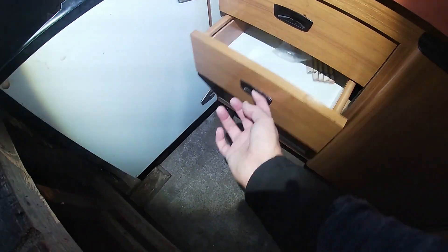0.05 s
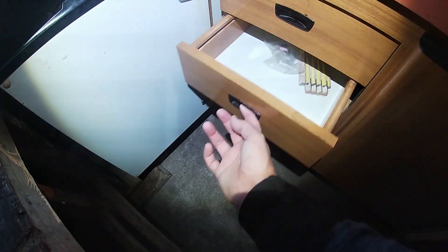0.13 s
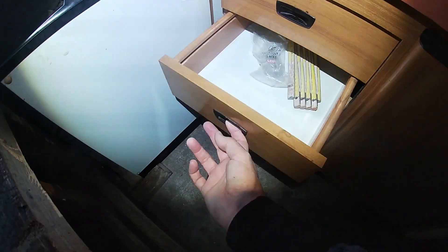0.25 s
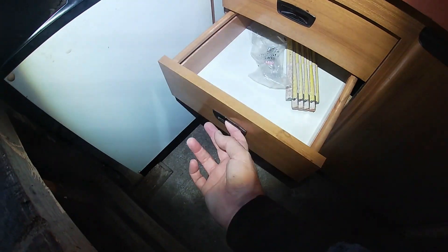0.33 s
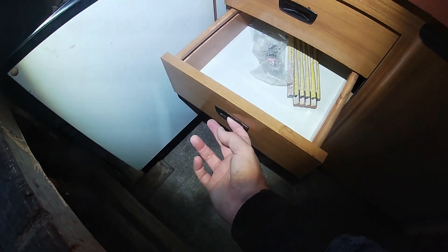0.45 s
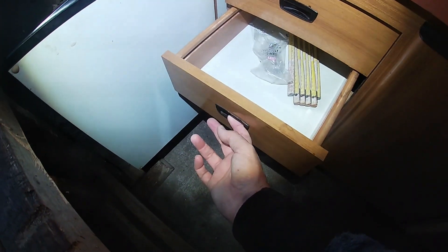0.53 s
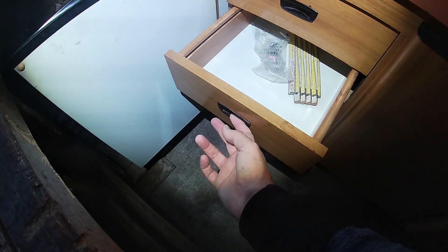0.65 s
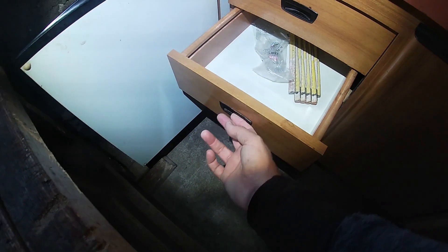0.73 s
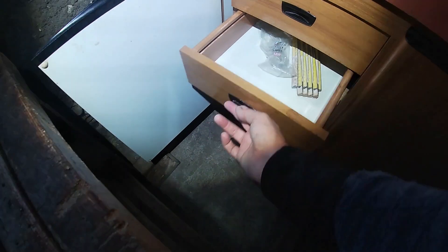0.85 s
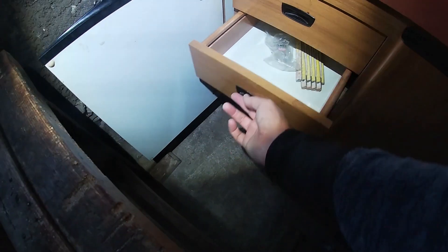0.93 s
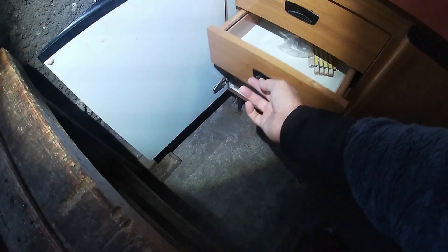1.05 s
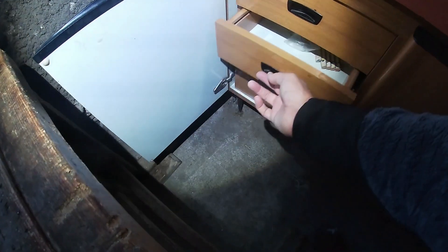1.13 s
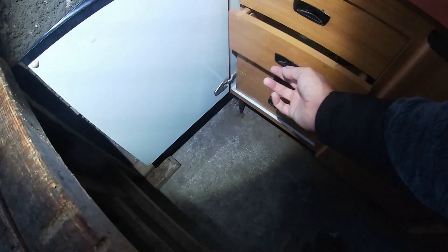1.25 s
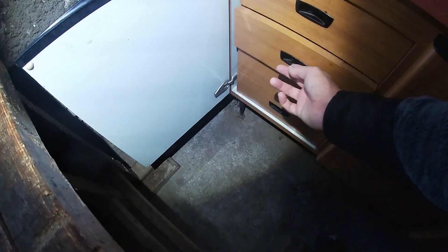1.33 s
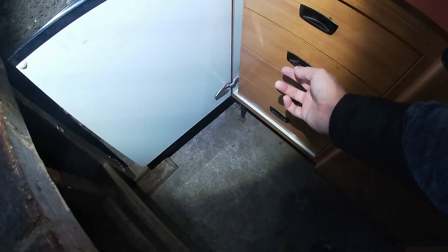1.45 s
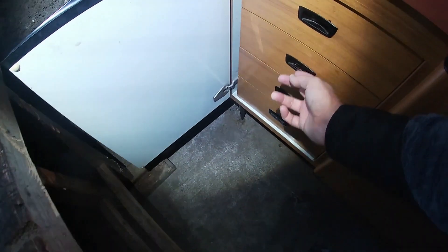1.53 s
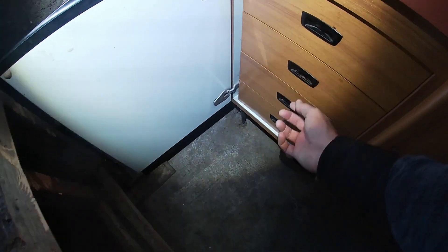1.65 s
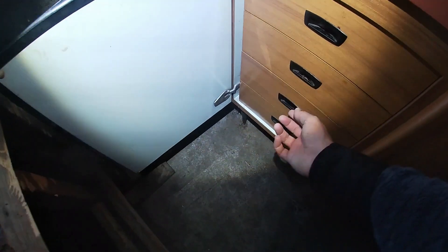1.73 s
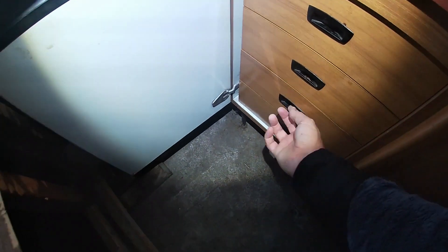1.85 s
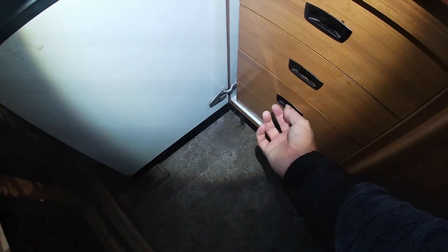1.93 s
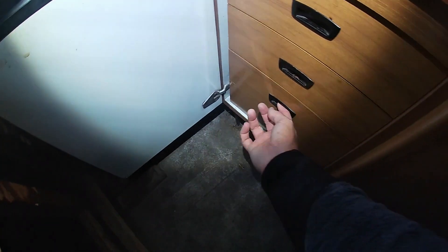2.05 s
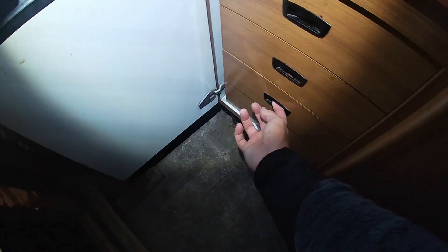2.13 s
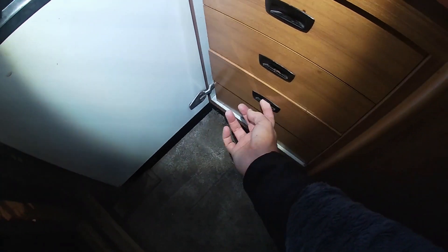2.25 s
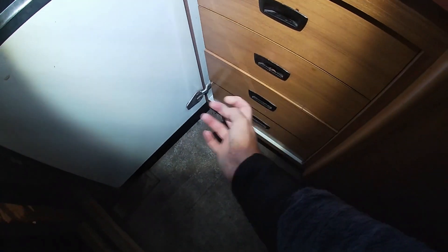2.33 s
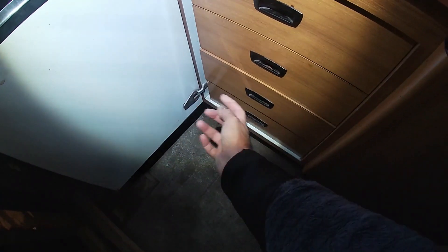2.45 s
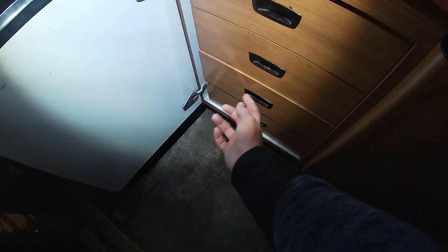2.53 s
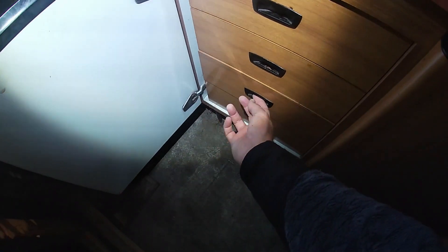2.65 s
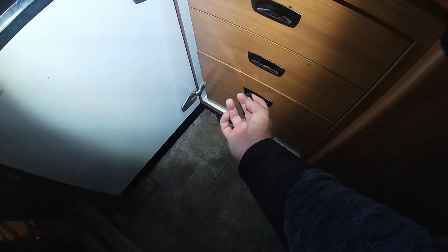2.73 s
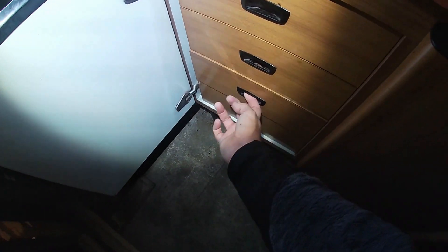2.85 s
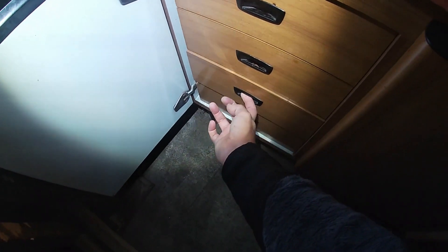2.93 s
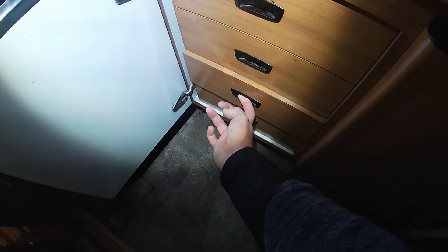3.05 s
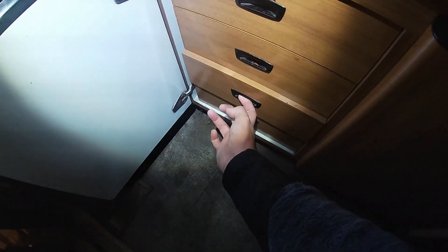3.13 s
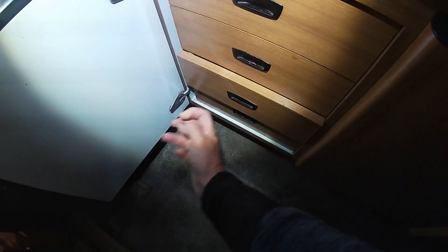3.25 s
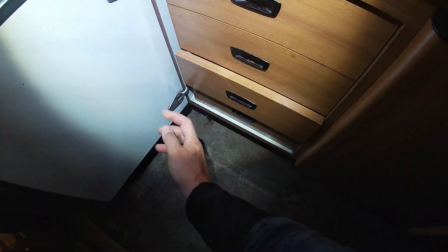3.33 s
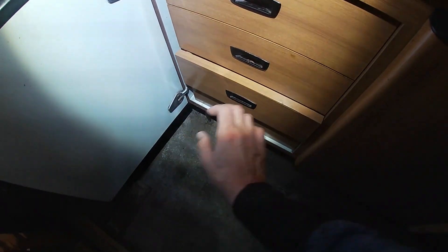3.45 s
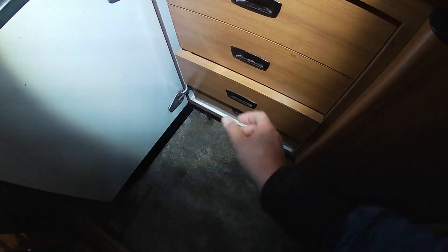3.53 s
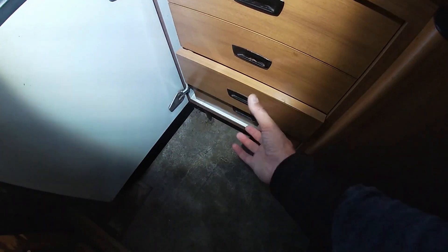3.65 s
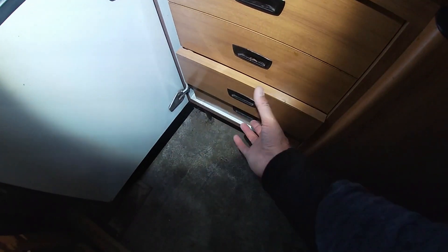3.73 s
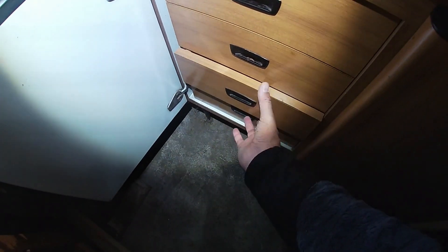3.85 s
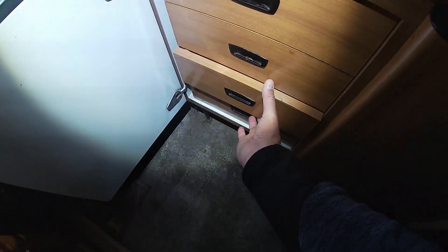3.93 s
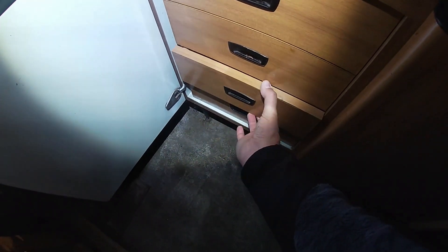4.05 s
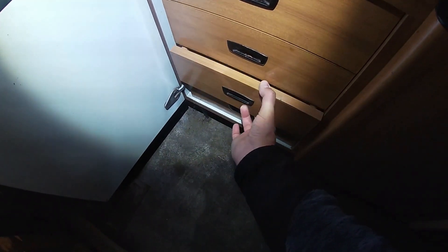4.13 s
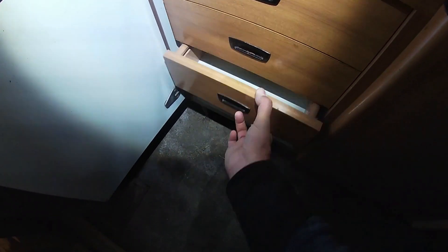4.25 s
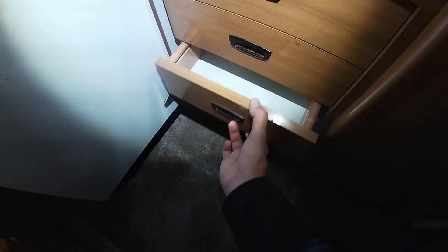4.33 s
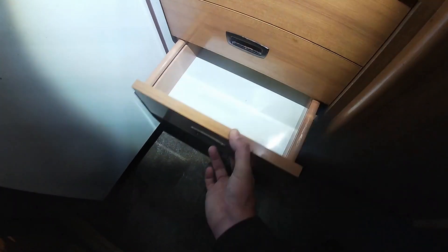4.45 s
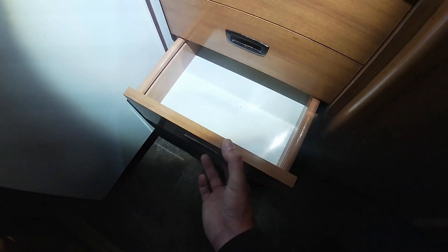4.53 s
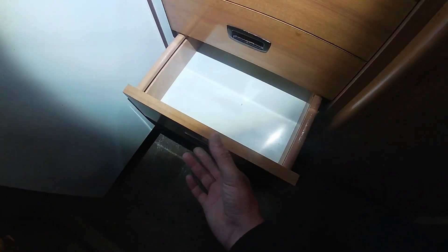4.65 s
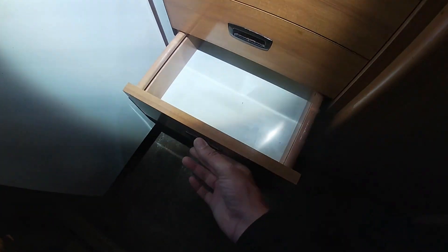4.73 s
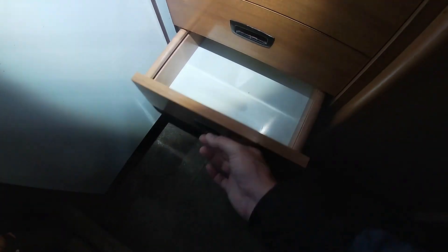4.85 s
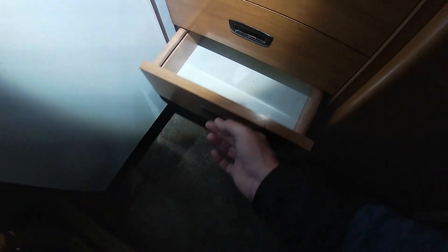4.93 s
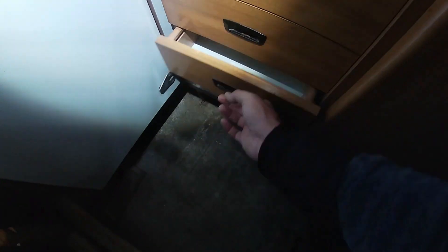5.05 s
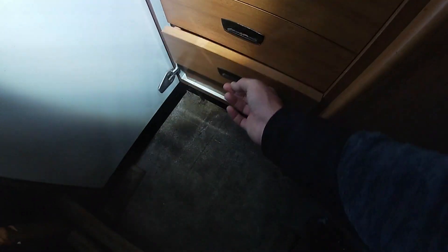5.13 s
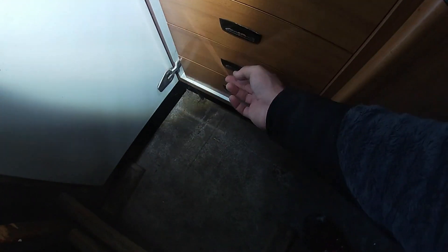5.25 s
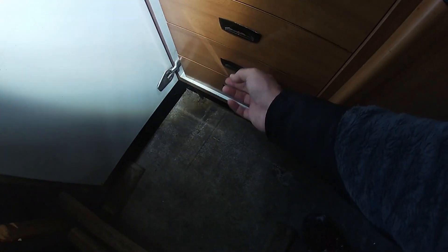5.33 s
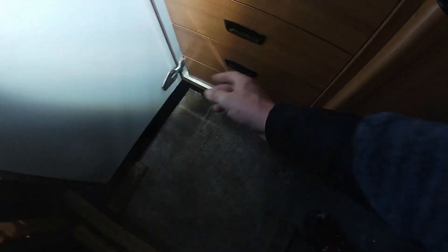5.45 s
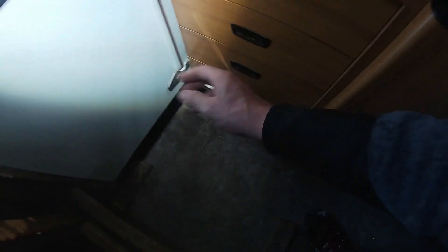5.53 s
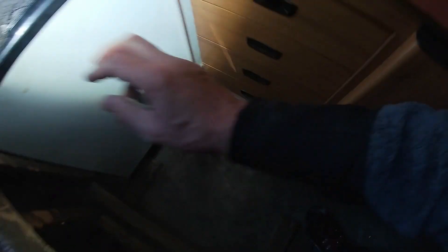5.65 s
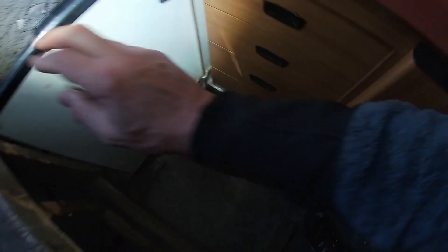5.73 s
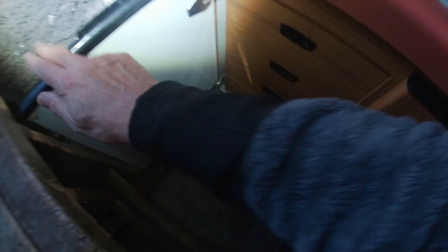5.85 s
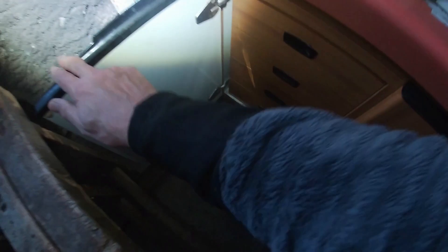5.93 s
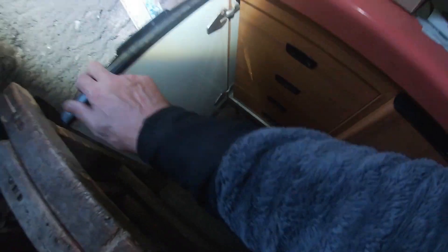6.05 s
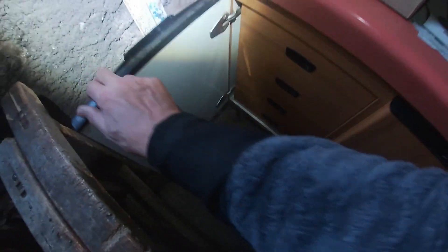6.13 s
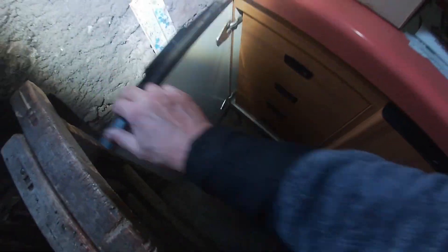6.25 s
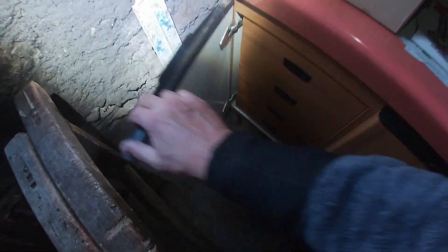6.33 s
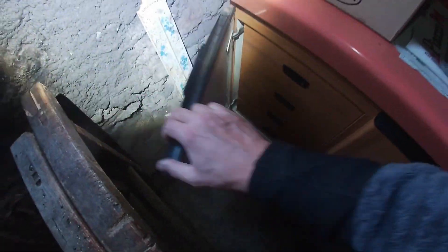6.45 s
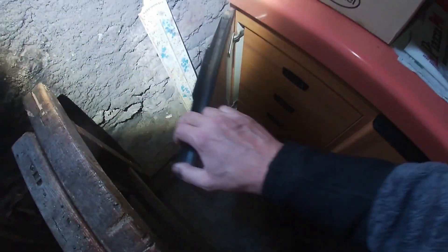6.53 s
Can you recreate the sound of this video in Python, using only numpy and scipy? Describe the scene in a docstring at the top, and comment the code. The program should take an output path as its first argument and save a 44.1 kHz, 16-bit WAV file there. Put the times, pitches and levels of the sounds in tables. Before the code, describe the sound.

Close, dry wooden drawers scrape, squeak and slam in a small room, with cracking knocks between them and a faint hollow fridge door at the end.

```python
"""Drawers and a fridge door in a hut kitchen

Two wooden drawers are pulled open and banged shut close to the microphone. Random catches on dry runners
drive resonances as rasp and rumble; gliding stick-slip tones squeak; blows ring decaying panel modes.
Filtered grains make soft breath-like hisses, scrapes, and the brush of fingers and a sleeve; at the end a
hollow fridge door thuds in low modes as it is swung aside. A short echo and a faint hush surround it."""
import sys
import numpy as np
from scipy import signal
from scipy.fft import rfft, irfft, next_fast_len
from scipy.io import wavfile
from scipy.ndimage import uniform_filter1d

SR = 44100
rng = np.random.default_rng(int(sys.argv[2]) if len(sys.argv) > 2 else 0)


def transcribe(signal):
    """Save signal, clipped to [-1, 1], as a 16-bit WAV file at the path in sys.argv[1]."""
    frames = np.atleast_2d(signal).T
    limited = np.clip(frames, -1, 1)
    pcm = np.round(limited * 32767).astype(np.int16)
    wavfile.write(sys.argv[1], SR, pcm)


N = 290212
T = np.arange(N) / SR
RING = T[:int(.6 * SR)]  # time axis of one decaying sound, s
RING_HZ = np.maximum(np.arange(len(RING) // 2 + 1) * SR / len(RING), 1)
OCTAVES = 30 * 2 ** np.arange(10)[:, None]  # band centres, Hz
OCTAVE_SHARE = np.maximum(1 - abs(np.log2(RING_HZ / OCTAVES)), 0)
CRUNCH_S = .004  # scatter of contacts in a bump or rebound

# spectrum of the runners' rasp: hz, level_db
RASP = [(900, -10), (2000, -5.5), (3000, -4.5), (3700, -1.5), (4500, -3.5), (5300, -10.5), (6500, -14),
        (7500, -19), (9000, -15), (10200, -20), (15000, -28)]
# spectrum of sleeve cloth and of soft hisses: hz, level_db
CLOTH = [(300, -8), (700, -3), (1000, -7), (1600, 0), (2800, -6), (3800, -1), (5500, -11), (9000, -18),
         (15000, -32)]
# spectrum of the hut's echo: hz, level_db
HUT = [(50, -11.5), (200, -10.5), (600, 1.5), (1500, -11), (4000, -13.5), (10000, 2)]
# decay of the hut's echo: hz, t60_s
HUT_T60 = [(100, 0.88), (500, 0.42), (2000, 0.5), (5000, 0.3), (12000, 0.049)]
# resonances of the upper drawer's bottom and sides: hz, width_hz, level_db
UPPER_BOX = [(380, 120, 6.5), (528, 160, 4.5), (600, 120, -1), (780, 200, -1.5), (1080, 320, -4.5),
             (1396, 160, -2.5), (1590, 70, 1.5), (1683, 30, 1), (1797, 55, -3.5), (2040, 110, -4),
             (2236, 60, 0.5), (2460, 120, -1.5), (2700, 60, -5.5)]
# resonances of the lower drawer's bottom and sides: hz, width_hz, level_db
LOWER_BOX = [(345, 24, 7.5), (584, 110, 3), (774, 130, -6), (1040, 88, 5.5), (1620, 170, 3.5),
             (1967, 160, -1), (2300, 330, 2.5), (2650, 45, 3.5), (2850, 61, -15)]
BOXES = {"upper": UPPER_BOX, "lower": LOWER_BOX}


def undb(db):
    """Logarithmic level: decibels to amplitude gain."""
    return 10 ** (np.asarray(db) / 20)


def unit(x):
    """Power normalisation: scale to rms 1."""
    return x / np.sqrt(np.mean(x ** 2) + 1e-20)


def loudest(x, size=882):
    """Short-time power: rms of the loudest stretch of size samples."""
    return np.sqrt(uniform_filter1d(x ** 2, size, mode="constant").max() + 1e-20)


def steady(x, size=1500):
    """Level equalisation: divide by the running rms, so that only the colour keeps changing."""
    return x / np.sqrt(np.abs(uniform_filter1d(x ** 2, size)) + 1e-12)


def add(out, s, x):
    """Superposition: mix x into out at time s."""
    i = max(int(s * SR), 0)
    out[i:i + len(x)] += x[:len(out) - i]


def lookup(points, hz):
    """Interpolation of a (Hz, value) table on a log-frequency axis."""
    f, value = np.transpose(points)
    return np.interp(np.log(np.maximum(hz, 1)), np.log(f), value)


def band(x, lo, hi, order=2):
    """Causal band-pass filtering."""
    sos = signal.butter(order, [lo, min(hi, SR / 2 - 1)], "band", fs=SR, output="sos")
    return signal.sosfilt(sos, x + 1e-18)


def colour(x, points):
    """Spectral weighting: multiply the spectrum of x by a (Hz, dB) curve."""
    n = next_fast_len(len(x) + SR // 10)
    hz = np.arange(n // 2 + 1) * SR / n
    return irfft(rfft(x, n) * undb(lookup(points, hz)), n)[:len(x)]


def resonate(x, peaks):
    """Forced resonance: parallel (Hz, width, dB) resonators driven by x."""
    return sum(undb(db) * signal.lfilter(*signal.iirpeak(hz, hz / width, SR), x) for hz, width, db in peaks)


def through(x, response):
    """Linear response: convolve x with an impulse response."""
    return signal.fftconvolve(x, response)[:len(x)]


def dense_ring(spectrum, t60s):
    """High modal density: overlapping modes become octave bands of noise, each with its own decay."""
    noise = rfft(rng.standard_normal(len(RING))) * undb(lookup(spectrum, RING_HZ))
    decay_rate = np.float32(-np.log(1000) / lookup(t60s, OCTAVES))
    decay = np.exp(np.maximum(decay_rate * np.float32(RING), -20))
    octaves = irfft(np.complex64(noise) * np.float32(OCTAVE_SHARE))
    return np.sum(octaves * decay, axis=0, dtype=float)


def walk(rate):
    """Slow random modulation: rate random values a second joined by lines, with a spread near 1."""
    steps = rng.standard_normal(2048)
    return np.interp(T * rate, np.arange(len(steps)), steps)


def grains(rate, spread_db):
    """Shot noise: random tiny contacts, rate a second, of unequal size."""
    hits = rng.random(N) < rate / SR
    return hits * rng.choice([-1, 1], N) * undb(spread_db * rng.standard_normal(N))


def shifting(x, peaks, sway_db, drift, rate):
    """Moving excitation point: each resonance swells and fades on its own, and all drift in pitch."""
    y = sum(resonate(x, [peak]) * undb(sway_db * walk(rate)) for peak in peaks)
    warped_time = T + np.cumsum(drift * walk(rate)) / SR
    return np.interp(warped_time, T, y)


def panels(scatter_db, detune):
    """Modal synthesis: decaying cabinet modes whose balance and pitch vary at random with each call."""
    # modes of cabinet and drawer panels: hz, level_db, t60_s
    cabinet = [(44.4, -9.5, 0.78), (76.24, 2.5, 0.39), (96, -15.5, 0.27), (117.1, -9.5, 0.55),
               (151.9, 2.5, 0.2), (160.2, 1, 0.51), (190.7, -4.5, .5), (215, -8, .25), (242.8, -8, 0.4),
               (280.3, -14, 0.46), (312, -12, 0.42), (363.7, -11.5, 0.15), (430, -10, 0.38),
               (468, -13, .35), (508.4, -9.5, 0.3), (629, -8, 0.22), (727, -12, 0.17)]
    hz, db, t60 = np.transpose(cabinet)
    size, pitch = rng.standard_normal((2, len(cabinet)))
    sign = (-1) ** np.arange(len(cabinet))
    phase = np.outer(np.float32(2 * np.pi * hz * (1 + detune * pitch)), np.float32(RING))
    decay = np.exp(-np.log(1000) * RING / t60[:, None])
    return np.einsum("m,mt,mt->t", sign * undb(db + scatter_db * size), np.sin(phase), decay)


def crunch(length, roughness):
    """Contact force: one sharp touch, then a fading scatter of smaller ones."""
    scatter = rng.standard_normal(len(RING)) ** 3 * np.exp(-RING / max(length, 1e-4))
    return (RING == 0) + roughness * scatter / np.linalg.norm(scatter)


def air():
    """Broadband background noise: the faint hush of the hut, slowly varying in level."""
    # spectrum of the still air: hz, level_db
    hush = [(25, -13), (40, -6), (80, -1), (170, 0), (280, -11), (500, -15), (1000, -21), (3800, -22),
            (6000, -29), (9500, -34), (15000, -42)]
    return unit(colour(rng.standard_normal(N), hush)) * undb(-62 + walk(0.56))


def effort(t, start, full, hold_s, stop, swell_db, slacken_db, run_out_s, power):
    """Force envelope: the hand brings the drawer up to speed, holds, eases off, and the drawer runs out."""
    # the power 1.3 makes the pull pick up quickly, then level off
    rising = np.maximum((full - t) / (full - start), 0) ** 1.3
    falling = np.clip((t - full - hold_s) / max(stop - full - hold_s, 1e-3), 0, 1) ** power
    run_out = np.exp(-np.maximum(t - stop, 0) / run_out_s)
    return undb(-swell_db * rising - slacken_db * falling) * run_out


def rasp(wander_db=4.5, count=5):
    """Friction noise: several runner patches rub at once, each with its own ring, under a shifting load."""
    # resonances of the runner strips under the moving contact: hz, width_hz, level_db
    runners = [(2400, 120, 0), (3080, 130, 1), (3740, 150, 3), (4300, 220, 2)]
    out = 0
    for _ in range(count):
        patch = dense_ring(RASP, [(1000, .05), (10000, .022)])  # hz, t60_s
        load = undb(wander_db * walk(14))
        out = out + through(grains(rate=970, spread_db=4) * load, patch)
    strips = shifting(out, runners, sway_db=4, drift=.02, rate=14)
    return band(steady(out + undb(-7.0) * strips), 600, 16000)


def slide(drawer, unevenness_db):
    """Friction-driven resonance: fine catches of wood grain rasp and ring the sides, coarser ones ring bottom
    and cabinet."""
    # each drawer is pulled out, then pushed back: drawer, start_s, full_speed_s, hold_s, stop_s, swell_db,
    # slackening_db, run_out_s, rasp_db, chatter_db, groan_db, rumble_db
    strokes = [("upper", 0.0, 0.25, 0.026, 0.466, 10.3, 6.9, .006, -38.5, -43.5, -38.5, -32),
               ("upper", 0.84, 0.96, 0.057, 1.7, 35, 25.1, .008, -35, -29, -31.5, -29.5),
               ("lower", 4.296, 4.522, 0.18, 4.675, 15.4, 9.7, 0.06, -40, -54, -41, -33),
               ("lower", 4.825, 4.89, 0.11, 5.309, 16.4, 13.8, .008, -37, -37, -36, -28.5)]
    # how rasp, chatter, groan and rumble follow a stroke: db_per_db_of_effort, slackening_power, lag_s
    responses = [(1.0, 0.79, 0.011), (1.4, 0.77, 0.011), (1.32, 1.02, 0), (0.84, 0.69, 0.037)]
    # the runners bind or run easy for a moment: centre_s, half_length_s, effort_change_db
    binds = [(0.198, 0.046, 3), (0.264, .03, 3), (0.339, 0.029, -2), (.4, 0.033, 5), (0.932, 0.0075, 1.5),
             (1.146, 0.012, 5.5), (4.924, 0.076, -3.5), (5.064, 0.027, -1)]
    # cabinet band shaken by each drawer, the deep one reaching the lowest modes: from_hz, to_hz
    rumble_hz = {"upper": (110, 330), "lower": (68, 205)}

    upper_modes = [peak for peak in BOXES[drawer] if peak[0] > 1000]
    fine_catches = grains(rate=900, spread_db=3.0)
    sides = band(shifting(fine_catches, upper_modes, sway_db=4, drift=.025, rate=24), 1300, 2700)
    bottom = band(resonate(grains(rate=300, spread_db=3), BOXES[drawer]), 300, 1150, order=3)
    # the hand and the runners damp the panels while the drawer moves
    held = panels(scatter_db=6, detune=0.0014) * np.exp(-RING / 0.028)
    rumble = band(through(grains(rate=270, spread_db=0), held), *rumble_hz[drawer], order=3)
    layers = [unit(rasp()), steady(sides), steady(bottom), steady(rumble, size=4000)]

    out = np.zeros(N)
    for name, start, full, hold_s, stop, swell_db, slacken_db, run_out_s, *levels in strokes:
        if name != drawer:
            continue
        near = (T > start - .5) & (T < stop + .5)
        for x, db, (follow, power, lag_s) in zip(layers, levels, responses):
            t = T[near] - lag_s
            gain = effort(t, start, full, hold_s, stop, swell_db, slacken_db, run_out_s, power)
            out[near] += undb(db) * x[near] * gain ** follow
    binding = sum(db * np.exp(-np.minimum(((T - s) / half_s) ** 2, 20)) for s, half_s, db in binds)
    return out * undb(binding + unevenness_db * walk(55))


def squeaks(rough=0.13):
    """Stick-slip oscillation: a binding edge sounds a short, unsteady, gliding tone."""
    # wood binds, and the door's hinge groans: start_s, length_s, start_hz, end_hz, level_db, pitch_waver_share
    slips = [(0.045, .045, 3740, 3760, -40, .015), (.39, .09, 4150, 4300, -43, .05),
             (0.901, .016, 470, 500, -28, .02), (.918, .045, 1400, 1720, -34, .05),
             (.925, .04, 2200, 2400, -38, .05), (0.972, .042, 1700, 1670, -24, .02),
             (.98, .06, 2250, 2650, -28, .08), (1.105, .05, 1350, 1300, -35, .08),
             (.94, .08, 5400, 5200, -38, .08), (1.02, .065, 2000, 1750, -31, .09),
             (1.05, .05, 2500, 2350, -32, .06), (4.52, .11, 3550, 3750, -41, .05),
             (4.59, .1, 1020, 1100, -39, .1), (4.848, .062, 1400, 1750, -31, .12),
             (4.855, .025, 4900, 5050, -44, .05), (4.868, .055, 2050, 2300, -32, .11),
             (4.93, .11, 1950, 1750, -34, .13), (6.41, .16, 264, 258, -56, .03)]
    out = np.zeros(N)
    for s, length, start_hz, end_hz, db, waver in slips:
        u = np.minimum(RING / length, 1)
        noises = rng.standard_normal((2, len(RING)))
        pitch, grip = (unit(uniform_filter1d(v, size=40)) for v in noises)
        hz = (start_hz + (end_hz - start_hz) * u) * (1 + waver * pitch)
        phase = 2 * np.pi * np.cumsum(hz) / SR
        swell = np.sqrt(np.abs(np.sin(np.pi * u))) * (1 + rough * grip)
        tone = np.sin(phase) + undb(-32.0) * np.sin(2 * phase)
        add(out, s, undb(db) * swell * tone)
    return out


def strike(db, boom_db, dull_db, ring_hz, crunch_s, box=None, sides_db=0, boards_db=17, roughness=0.6,
           favour_db=10.0, ring_s=0.028, echo_db=-6, crack_fall=2.64):
    """Impact excitation: the spot favours one ring, weight adds boom, a soft contact dulls the treble."""
    # dense, short modes of the boards: hz, level_db
    board_spectrum = [(35, -8), (160, -3), (400, -5), (700, -6), (900, -9), (1500, -6.5), (2300, -6),
                      (3200, -4), (4000, -5), (5000, -17), (6000, -21), (7500, -27), (9500, -28),
                      (15000, -38)]
    # decay of the boards: hz, t60_s
    board_t60 = [(60, 0.65), (200, 0.34), (600, 0.17), (1500, 0.13), (4000, 0.076), (10000, 0.012)]
    # registers of boom, body, upper body and crack: from_hz, to_hz
    band_edges = [(25, 110), (110, 400), (400, 1500), (1500, 15000)]

    boards = through(crunch(crunch_s, roughness), dense_ring(board_spectrum, board_t60))
    if box:  # a hard blow rings the drawer's own sides too
        boards = boards + undb(sides_db) * band(resonate(boards, box), 1600, 2700)
    # every spot reaches the walls by other paths, so each blow has its own diffuse tail
    echo = colour(dense_ring(board_spectrum, HUT_T60), HUT)
    favoured = undb(favour_db) * np.sin(2 * np.pi * ring_hz * RING) * np.exp(-RING / ring_s)
    broadband = undb(boards_db) * (boards + undb(echo_db) * echo)
    ring = panels(scatter_db=2.5, detune=0.006) + favoured + broadband
    registers = [band(ring, lo, hi, order=3) for lo, hi in band_edges]
    # each register is set on its own; the body register stands at db
    gains = undb(db + np.array([boom_db, 0, -dull_db, -crack_fall * dull_db]))
    return sum(gain * x / loudest(x) for gain, x in zip(gains, registers))


def bumps():
    """Impact excitation: single knocks as a drawer bumps on its runners and stops."""
    # knocks: start_s, body_level_db, boom_above_body_db, dullness_db, favoured_ring_hz
    knocks = [(0.085, -32.5, -2, 16, 261), (0.234, -25.5, -6.5, 7.5, 325), (0.262, -36, -7, 11, 299),
              (0.3695, -33.5, -1, 3.5, 404), (0.551, -32.5, -1.5, 27, 161), (0.935, -29, 0, 16, 205),
              (1.171, -25.5, -4.5, 11, 255), (1.366, -35, 3, 4, 400), (2.203, -40.5, 1.5, 18, 183),
              (2.286, -42, 2.5, 23, 167), (2.683, -49, -8, 6, 164), (2.8, -37, -5, 7.5, 177),
              (2.855, -39.5, 7.5, 19, 153), (2.897, -34, -17, 6, 429), (2.903, -21.5, -4, 6, 560),
              (2.96, -32.5, 3, 9, 220.3), (3.95, -54, 6, 35, 172), (4.058, -69, 16.5, 20, 176),
              (4.224, -40.5, -8, 14, 176), (4.28, -25, -1, 7, 149), (4.335, -42, 15.5, 20, 121),
              (4.565, -28, -18, 7.5, 530), (4.577, -20, -4, 27, 349), (4.664, -22.5, -2, 10, 350),
              (4.906, -16, -19, 7.5, 345), (4.931, -24, -6, 7.5, 340), (4.977, -17, -5.5, 10.5, 345),
              (5.021, -26.5, -4.5, 15, 143), (5.346, -20, -6, 5, 620), (5.426, -29, -4, 7, 470)]
    out = np.zeros(N)
    for s, *blow in knocks:
        add(out, s, strike(*blow, CRUNCH_S, favour_db=5))
    return out


def taps():
    """Short contact, broad spectrum: hard edges touch and scuff in brief clusters of clicks."""
    # clicks of handles, drawer edges and the door catch: start_s, level_db, centre_hz, length_s
    clicks = [(0.234, -31.5, 4000, 0.003), (0.37, -38.5, 2000, 0.002), (0.646, -69, 1700, .004),
              (1.172, -43.5, 5000, 0.003), (1.367, -43, 1050, .003), (1.535, -24.5, 4340, 0.0036),
              (1.951, -52.5, 3790, 0.0044), (2.179, -54, 2760, 0.011), (2.229, -57, 4540, 0.003),
              (2.407, -47, 7000, 0.0037), (2.431, -44, 6500, 0.0069), (2.68, -55, 4000, 0.01),
              (2.904, -48, 3800, 0.01), (2.96, -46.5, 5600, 0.0056), (4.223, -45.5, 3200, 0.0076),
              (4.565, -33.5, 1030, 0.0031), (4.665, -35.5, 2500, 0.003), (4.785, -49, 1600, 0.0037),
              (4.844, -43, 800, 0.0044), (4.906, -31, 1860, 0.004), (5.67, -59, 2014, 0.012),
              (5.732, -68.5, 2600, .005), (6.021, -65, 4490, 0.0095), (6.306, -64, 4200, 0.018)]
    out = np.zeros(N)
    for s, db, hz, length in clicks:
        click = colour(crunch(length, roughness=27), RASP)
        click = band(click, hz / 2, hz * 1.35, order=3)
        add(out, s, undb(db) * click / loudest(click))
    return out


def slams(count=2):
    """Inelastic rebound: the drawer hits the cabinet's back, rocks it and rebounds weaker and duller."""
    # a free-running drawer slams home: drawer, start_s, body_level_db, boom_above_body_db, dullness_db,
    # favoured_ring_hz, crunch_length_s, sides_ring_db, loss_per_rebound_db
    impacts = [("upper", 1.5348, -14, -2.4, 5.2, 165, 0.0012, -26, 3.8),
               ("lower", 5.327, -11.5, -11, 6.3, 235, 0.0063, -8.5, 6.3)]
    sway_hz, sway_db, sway_s = 41, -6, .07  # rocking cabinet: pitch, level re the slam, decay
    rebound_s, rebound_hz = .036, 159.5  # spacing and favoured ring of the rebounds
    rebound_boom_db, rebound_dull_db = -2, 6.5  # boom of each, added dullness per rebound
    out = np.zeros(N)
    for drawer, s, db, boom_db, dull_db, ring_hz, crunch_s, sides_db, loss_db in impacts:
        blow = strike(db, boom_db, dull_db, ring_hz, crunch_s, BOXES[drawer], sides_db,
                      favour_db=10, ring_s=0.013)
        add(out, s, blow)
        sway = np.sin(2 * np.pi * sway_hz * RING) * np.exp(-RING / sway_s)
        add(out, s, undb(db + sway_db) * sway)
        for k in range(1, count + 1):
            rebound = strike(db - k * loss_db, rebound_boom_db, dull_db + k * rebound_dull_db,
                             rebound_hz, CRUNCH_S)
            add(out, s + k * rebound_s, rebound)
    return out


def snaps(roughness=1.2):
    """Impulsive excitation of a narrow resonance: hard cracks as a wedged edge lets go or a drawer slams home."""
    # cracks: start_s, level_db, centre_hz, width_hz, length_s
    cracks = [(1.535, -18, 3000, 2200, 0.0019), (2.4025, -31, 2800, 700, .002),
              (2.4072, -25, 3200, 900, 0.0025), (2.434, -28, 3900, 1400, .005),
              (3.3268, -19.5, 2950, 700, 0.0027), (3.331, -19.5, 3550, 900, 0.0025),
              (5.3261, -15.5, 2700, 1900, .0015)]
    out = np.zeros(N)
    for s, db, hz, width, length in cracks:
        edge = [(hz, width, 0)]
        ringing = resonate(resonate(crunch(length, roughness), edge), edge)
        crack = band(ringing, 1000, 4400, order=4)
        add(out, s, undb(db) * crack / loudest(crack, size=176))
    return out


def rubs():
    """Filtered shot noise: soft breath-like hisses, scrapes, and fingertips that ring a drawer front."""
    # soft breath-like hisses, fingertips on a drawer front or handle, and the soft scrape of the tight drawer
    # just before it gives: start_s, swell_s, hold_s, release_s, level_db, brightness_db, front_ring_db
    strokes = [(1.664, 0.15, 0.31, 0.15, -55.5, -6, -9.5), (1.942, .01, 0.096, 0.063, -60, 18, 22),
               (2.388, .015, .002, .01, -49, 6, 0), (2.679, 0.019, 0.0087, 0.028, -53, 6, 5),
               (2.799, 0.012, 0.019, 0.022, -57.5, 4, 5), (3.278, 0.056, .002, .01, -48, -0.5, -5.5),
               (3.833, 0.016, 0.057, 0.14, -59.5, 0.5, -3), (3.968, 0.046, 0.018, 0.014, -54.5, 1, 16),
               (4.09, 0.038, 0.023, 0.023, -62.5, -2, -8), (4.174, 0.035, 0.015, 0.022, -54, 17, -2),
               (4.743, 0.038, 0.01, 0.012, -53, 11, -2)]
    # resonances of a rubbed front: hz, width_hz, level_db
    front_modes = [(609, 38, 8.5), (764, 41, -7), (1437, 22, 2.5), (1557, 53, -0.5), (2000, 78, -2.5),
                   (2330, 35, 0), (2980, 55, -5), (3660, 160, 5.5), (4210, 133, -14.5)]
    catches = grains(rate=3000, spread_db=3.5)
    plain = unit(colour(catches, CLOTH))
    front = steady(shifting(catches, front_modes, sway_db=2.5, drift=.008, rate=12))
    both = np.array([plain, front])
    dull, bright = band(both, 300, 2700), band(both, 2700, 12000)
    out = np.zeros(N)
    for s, swell_s, hold_s, release_s, db, bright_db, ring_db in strokes:
        release = np.exp(-np.clip((T - s - swell_s - hold_s) / release_s, 0, 20))
        envelope = np.clip((T - s) / swell_s, 0, 1) * release
        hiss, ring = dull + undb(bright_db) * bright
        out += undb(db) * envelope * unit(hiss + undb(ring_db) * ring)
    return out * undb(0.78 * walk(28))


def jerks():
    """Intermittent contact: the tight lower drawer gives in quick, separate blows."""
    # it jerks in or out of its frame; an edge grazes, then its sides knock in turn: start_s, body_level_db,
    # boom_above_body_db, dullness_db, favoured_ring_hz, crunch_length_s
    contacts = [(2.4063, -34.5, -9.5, 0, 602, .006), (2.4224, -25, -9.5, 4.5, 312, .003),
                (2.426, -15.5, -14.5, 9, 158.9, .002), (2.4332, -21, -5.5, 7.5, 162.4, .005),
                (3.3262, -32, -9.5, -1, 602, 0.0069), (3.3403, -22, -9.5, 4, 215, 0.0035),
                (3.3443, -16.5, -7.5, 6.5, 161.1, 0.0022), (3.3531, -19, -8.5, 4.5, 159.8, 0.0068)]
    out = np.zeros(N)
    for s, *blow in contacts:
        knock = strike(*blow, box=LOWER_BOX, sides_db=-11.0, ring_s=0.04, favour_db=9,
                       echo_db=-6.5, crack_fall=1.7)
        add(out, s, knock)
    return out


def sleeve():
    """Fibre friction: cloth rubs and crinkles softly as the arm reaches about and swings the door."""
    # the sleeve brushes past: start_s, hold_s, level_db, release_s
    brushes = [(3.6, .12, -72, .02), (4.18, 0.049, -52.5, 0.035), (5.602, 0.086, -51.5, 0.0043),
               (5.785, 0.16, -80, 0.062), (5.999, 0.032, -63, 0.41), (6.4, 0.038, -55.5, 0.047),
               (6.506, .07, -76.5, .1)]
    # folds of the sleeve ring briefly: hz, width_hz, level_db
    fold_modes = [(1155, 75, 4.5), (1600, 370, 2), (2030, 100, 5), (2800, 100, 4.5), (4540, 530, -7)]
    attack_s = 0.011
    rub = np.zeros(N)
    for s, hold_s, db, release_s in brushes:
        attack = np.clip((T - s) / attack_s, 0, 1)
        rub += undb(db) * attack * np.exp(-np.clip((T - s - hold_s) / release_s, 0, 20))
    cloth = colour(grains(rate=1500, spread_db=-0.5), CLOTH)
    folds = shifting(cloth, fold_modes, sway_db=3, drift=.015, rate=18)
    return steady(cloth + folds) * rub * undb(2 * walk(45))


def door(favour_db=13.5, ring_s=0.03):
    """Modal excitation by soft force: pushes and tugs make the hollow door thud, each favouring one ring."""
    # the fridge door is gripped, pulled free of its seal and swung: start_s, level_db, softness_s,
    # favoured_ring_hz
    pushes = [(5.695, -40, .006, 138), (6.022, -32, .022, 78.6), (6.085, -38, 0.0077, 105.5),
              (6.16, -45, .012, 80), (6.335, -56, .02, 80.6), (6.445, -47, 0.029, 83)]
    # modes of the door's hollow body: hz, level_db, t60_s
    body_modes = [(78.8, 4, 0.21), (104, -5.5, 0.43), (147.4, -5, 0.2), (186.6, -7.5, 0.29), (249, -9, 0.2),
                  (316.5, -11, 0.15), (443, -19, 0.081), (850, -18, 0.081), (1114, -28, 0.084),
                  (1600, -22.5, 0.058), (2050, -26, 0.058)]
    body = sum(undb(mode_db) * np.sin(2 * np.pi * hz * RING) * undb(-60 * RING / t60)
               for hz, mode_db, t60 in body_modes)
    out = np.zeros(N)
    for s, db, soft_s, ring_hz in pushes:
        favoured = undb(favour_db) * np.sin(2 * np.pi * ring_hz * RING) * np.exp(-RING / ring_s)
        onset = 1 - np.exp(-(RING / soft_s) ** 2)
        thud = (favoured + through(crunch(soft_s, roughness=1.0), body)) * onset
        add(out, s, undb(db) * thud / loudest(thud))
    return out


def hut(x, build_s=0.0089):
    """Diffuse reverberation: the small room's echo builds in milliseconds and dies in a fraction of a second."""
    echo = dense_ring(HUT, HUT_T60) * (1 - np.exp(-RING / build_s))
    return x + undb(-32.0) * through(x, echo)


def scene():
    """Superposition: drawers, soft hisses, hand and door in the room; struck blows carry their own echo."""
    # low note that hangs in the hut after the upper drawer has moved: hz, width_hz, level_db
    linger = [(191, 1.1, -6.5)]
    upper = slide("upper", unevenness_db=0.75)
    upper = upper + resonate(upper, linger)
    lower = slide("lower", unevenness_db=0.8)
    knocks = slams() + jerks() + snaps() + bumps()
    in_room = hut(upper + lower + squeaks() + taps() + rubs() + sleeve() + door())
    return (knocks + in_room + air())[None]


def record(dry):
    """Transducer response: the microphone drops the deepest bass, dulls the treble and cuts the top."""
    # the microphone's treble: hz, level_db
    mic = [(10000, -0.5), (11200, -13.5), (15000, -8.5)]
    x = colour(dry[0], mic)
    x = signal.sosfilt(signal.butter(2, 20, "high", fs=SR, output="sos"), x)
    top_cut = signal.ellip(8, .2, 70, 15200, fs=SR, output="sos")
    return signal.sosfilt(top_cut, x)[None]


dry = scene()
out = record(dry)
transcribe(out)
```